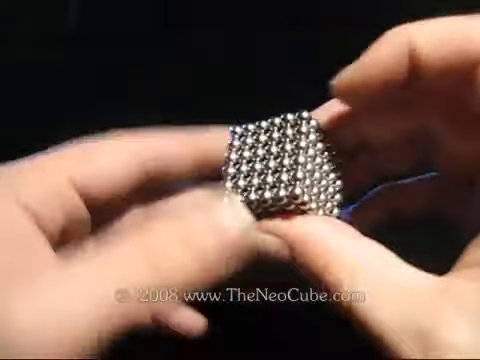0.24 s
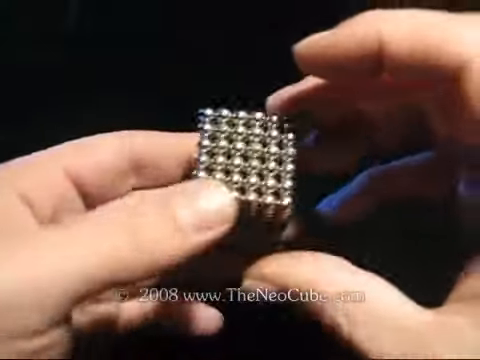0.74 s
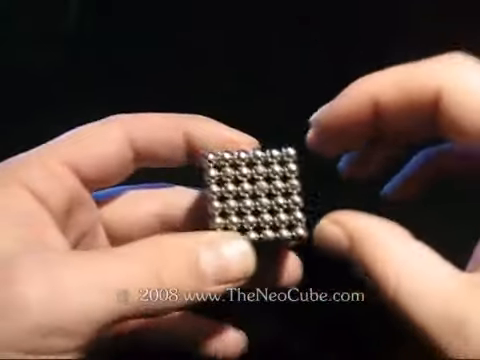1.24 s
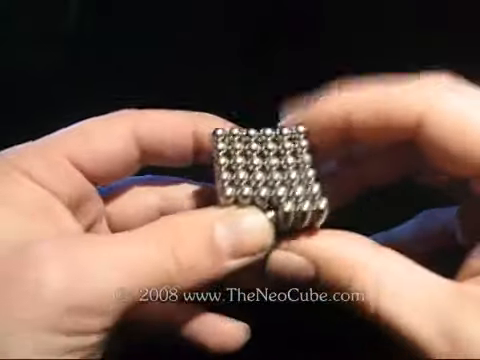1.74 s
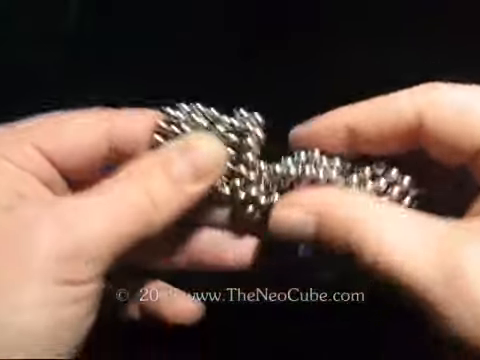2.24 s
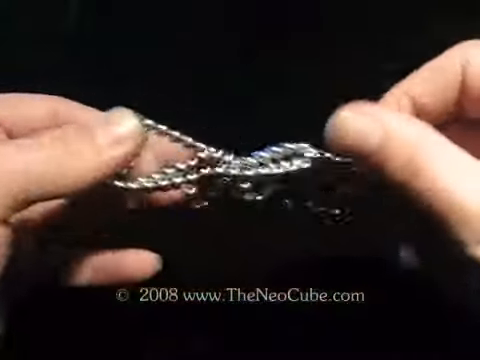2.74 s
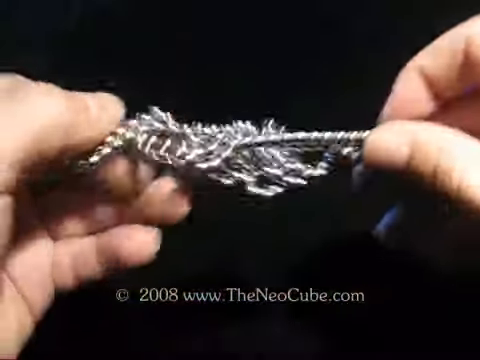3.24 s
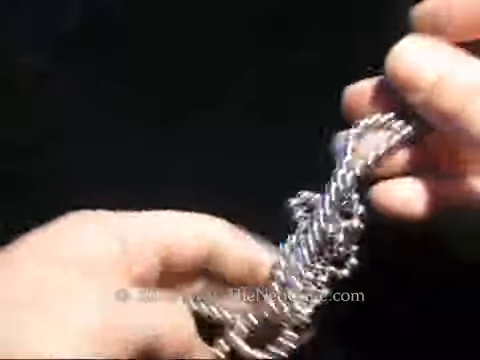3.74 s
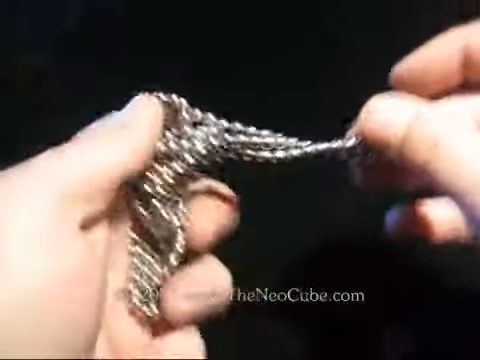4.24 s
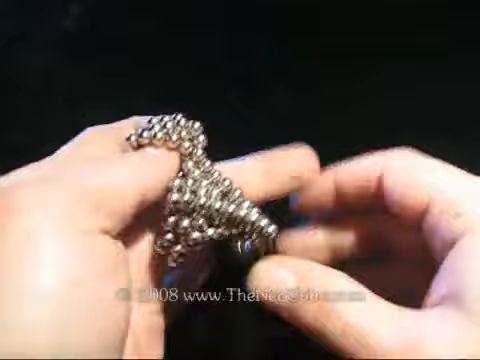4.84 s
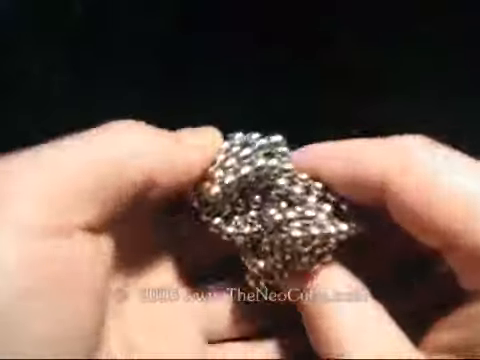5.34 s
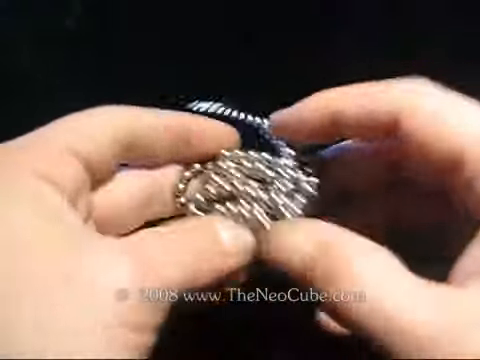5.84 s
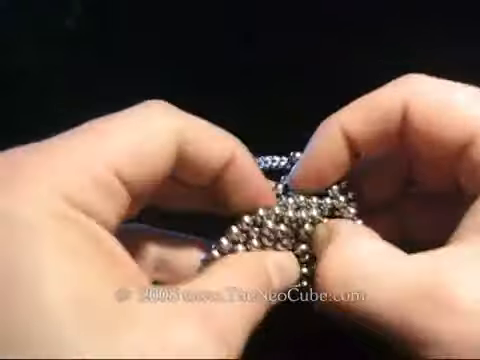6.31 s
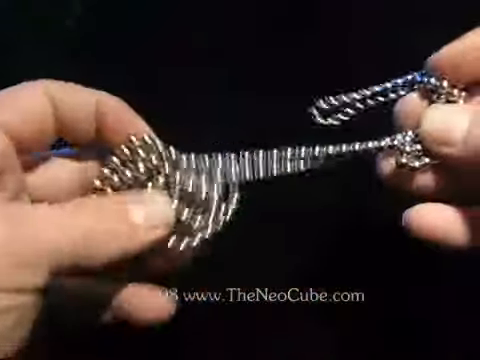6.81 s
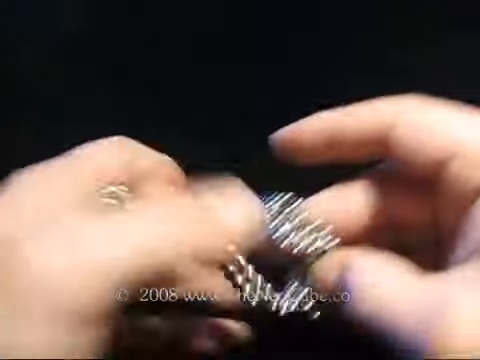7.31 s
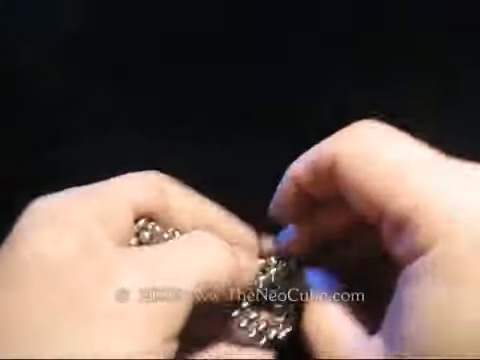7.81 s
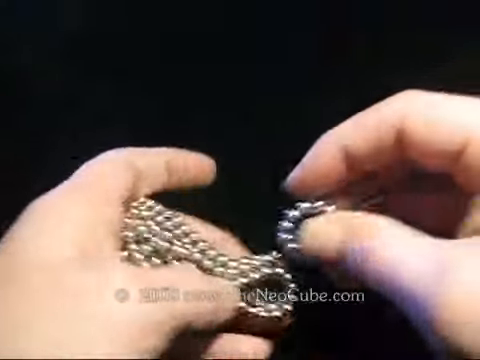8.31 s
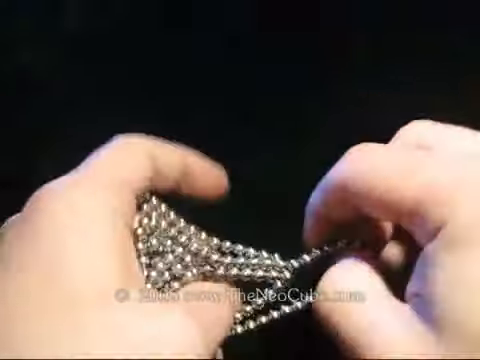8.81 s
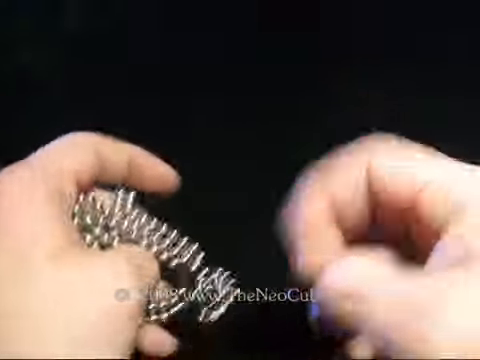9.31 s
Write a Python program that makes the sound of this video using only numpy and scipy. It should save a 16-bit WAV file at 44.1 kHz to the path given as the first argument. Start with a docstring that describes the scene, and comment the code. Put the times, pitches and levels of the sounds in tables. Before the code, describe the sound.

A low fan-like hum with hiss, then small magnetic metal balls snap, click and crackle irregularly in the hands, close and gritty.

```python
"""Small magnetic steel balls pulled apart and kneaded by hand, close to a cheap microphone.
It opens on a low fan-like hum with hiss: wavering sines over filtered noise. From about 1.7 s damped
rings with a sharp tick make the dry snaps, fast showers of them the zips, and ticks, rattle and dull noise
the crackle of each squeeze, while the hum dips and fades. Toward the end the snaps grow fainter and sparser.
Coarse 8-bit steps at a quarter of the rate make the quiet parts gritty throughout."""
import sys
import numpy as np
from scipy import signal
from scipy.fft import rfft, irfft, next_fast_len
from scipy.io import wavfile
from scipy.ndimage import uniform_filter1d, map_coordinates

SR = 44100
rng = np.random.default_rng(int(sys.argv[2]) if len(sys.argv) > 2 else 0)


def to_wav(sig):
    """Store sig (one row per channel, or 1-D mono) as 16-bit WAV at the path in sys.argv[1].

    Samples outside -1..1 are clipped; the rate is SR.
    """
    pcm = np.clip(np.atleast_2d(sig), -1, 1) * 32767
    pcm = np.round(pcm).astype(np.int16)
    wavfile.write(sys.argv[1], SR, pcm.T)  # frames by channels


N = 421596
TIME = np.arange(N) / SR  # s
HOLD = 4  # output samples for each sample of the recorder


def undb(db):
    """Decibels to gain."""
    return 10 ** (np.asarray(db) / 20)


def unit(x):
    """Scale to rms 1."""
    return x / np.sqrt(np.mean(x ** 2))


def gain_curve(rows):
    """Gain at every sample from (t/s, level/dB) rows."""
    return undb(np.interp(TIME, *np.transpose(rows)))


def add(out, s, sound):
    """Mix a sound in at a time in seconds."""
    start = max(int(round(s * SR)), 0)
    part = sound[:max(N - start, 0)]
    out[start:start + len(part)] += part


def colour(x, points):
    """Filter by a spectrum of (f/Hz, level/dB) points, joined by straight lines over log frequency."""
    hz, db = np.transpose(points)
    size = next_fast_len(N + 4096)
    freqs = np.maximum(np.fft.rfftfreq(size, 1 / SR), 1)
    gain = undb(np.interp(np.log(freqs), np.log(hz), db))
    return irfft(rfft(x, size) * gain, size)[:N]


def wander(rate):
    """Smooth random drift with a spread near 1, from `rate` random knots per second."""
    knots = rng.standard_normal(int(N / SR * rate) + 4)
    return map_coordinates(knots, [TIME * rate], order=2, mode="nearest")


def click(hz, t60_ms, hardness, size=512):
    """One collision: a hard contact tick, then a few cycles of the clump, damped by the fingers."""
    t = np.arange(size) / SR
    decay = 1000 ** (-t * 1000 / max(t60_ms, .5))
    wave = np.sin(2 * np.pi * hz * t) * decay
    wave[0] -= HOLD * hardness  # the tick is a single sample
    return wave


def patter(per_s, scatter_db, low_hz, high_hz, t60_ms, hardness, count=10):
    """Random small collisions of uneven size at many contacts, each with its own pitch; rms 1."""
    out = np.zeros(N)
    hits = max(int(per_s * N / SR / count), 1)
    for hz in np.geomspace(low_hz, high_hz, count):
        when, luck, side = rng.random((hits, 3)).T
        excess_db = scatter_db * np.minimum(-np.log(1 - luck), 3)  # few large blows, many small
        sizes = undb(excess_db) * np.sign(side - .5)  # either polarity
        blows = np.bincount((when * N).astype(int), sizes, N)
        out += signal.oaconvolve(blows, click(hz, t60_ms, hardness))[:N]
    return unit(out)


def snaps(rattle_db=-21, rise_s=.0013, fade_s=.0035):
    """Balls jump together; a faint rattle swells for about a millisecond before each snap and fades after it."""
    # the snaps that stand out: [t/s, strength/dB, ring f/Hz, ring t60/ms, hardness: tick relative to ring]
    snap_rows = [(1.669, 0, 1420, 1.6, 0.47), (1.6735, -3.5, 814, 1.8, .3), (1.7144, -15.5, 1670, 2.3, 0.2),
                 (1.7202, -8.5, 1280, 3.8, 0.1), (1.9105, -6, 1650, 2.2, 0.3),
                 (1.9135, -13.5, 1820, 2.1, 1.6), (1.9415, -8.5, 1920, 1.9, .15),
                 (1.9509, -10.5, 2000, 3.4, .1), (2.158, -19.5, 1850, 1.5, 0.4),
                 (2.2452, -12, 990, 2.6, 0.9), (2.2556, -12.5, 1440, 6, .8), (2.274, -12, 1300, 3.5, 0.75),
                 (2.3129, -12.5, 2270, 1.4, .25), (2.382, -22.5, 2270, 5.1, 0.2),
                 (2.5061, -18.5, 2700, 1.8, .5), (2.5257, -16.5, 1760, 1.1, 0.16),
                 (2.5722, -16.5, 1950, 2.7, 0.2), (2.6306, -20.5, 2270, 2.2, 0),
                 (2.6722, -9.5, 2940, 0.89, 1.94), (2.701, -10, 1500, 2.4, 1), (2.757, -3, 2880, 4.5, .5),
                 (2.7636, -11.5, 2390, 3.5, .3), (2.8361, -11.5, 2180, 3.9, 0), (2.8721, -12, 2560, 3.3, 0),
                 (3.0668, -13.5, 1530, 4.1, 0.36), (3.286, -18, 2440, 5.7, .1),
                 (3.2986, -6.5, 1590, 2.6, 0.27), (3.3049, -9, 2310, 4, 0), (3.3466, -14, 2100, 2.3, 0),
                 (3.3525, -13, 1850, 7, .3), (3.3724, -21.5, 1430, 4.8, 1), (3.4722, -19.5, 1810, 3.1, 0.7),
                 (3.568, -20.5, 1890, 1.8, -0.5), (3.5999, -4.5, 2470, 1.4, 0),
                 (3.6127, -13, 1850, 4.8, 0.35), (3.632, -11.5, 2010, 5, 0.2), (3.657, -21, 1960, 5, 0.2),
                 (3.8305, -15, 1640, 2.5, 0.8), (3.8474, -17, 1360, 2.2, 1), (3.938, 0, 1160, 2, 0.76),
                 (4.0467, -13.5, 1760, 0.55, .25), (4.1223, -11, 3360, 0.97, 0.26),
                 (4.1935, -15, 2300, 2.2, 0), (4.204, -11, 2020, 1.1, 0), (4.2655, -18, 1670, 6.2, .3),
                 (4.3146, -11.5, 1180, 1.7, 0.4), (4.3516, -13.5, 1410, 2.6, 0.56),
                 (4.4371, -21, 1850, 4.9, 0.1), (4.4613, -18.5, 1940, 9.2, 0.6),
                 (4.5117, -19, 1170, 2.7, 0.5), (4.5552, -20, 1670, 3, .15), (4.5809, -14, 1590, 3.3, .6),
                 (4.6569, -11.5, 1775, 6, 0.25), (4.7138, -28, 695, 4, 2), (4.7373, -22.5, 1800, 5.9, 0.14),
                 (4.796, -21.5, 1730, 1.4, 0.2), (4.8278, -20.5, 1610, 2.5, 0.7),
                 (4.914, -19.5, 1940, 2.3, 0), (4.941, -24.5, 3470, 1.8, 1.5),
                 (5.1509, -19.5, 1650, 2.9, 0.2), (5.18, -29, 695, 3.7, .8), (5.203, -23.5, 1940, 2.7, 0),
                 (5.279, -28.5, 2310, 3.6, -0.5), (5.4, -14.5, 1300, 1.75, .2),
                 (5.5262, -21.5, 1960, 4.7, 0.9), (5.6875, -8, 1870, 2, .3),
                 (5.6977, -15.5, 1290, 1.7, 0.9), (5.723, -10.5, 1270, 1.36, 0),
                 (5.768, -17, 2050, 2.5, 0.37), (5.816, -23, 1830, 3.7, 0.5), (5.95, -18, 2130, 1.4, 0.06),
                 (5.9867, -14, 1660, 3.8, 0.76), (6.0376, -13, 2040, 1.8, .5),
                 (6.056, -20.5, 1630, 2.8, .5), (6.106, -23.5, 1930, 7.2, .5),
                 (6.1963, -20.5, 1950, 1.4, .5), (6.2862, -13, 1900, 2.4, 0), (6.3656, -8, 2000, .8, .5),
                 (6.3699, -15, 2300, 5.2, 1.4), (6.393, -18.5, 3000, 1.8, 0.1), (6.456, -16, 1460, .9, 0),
                 (6.5018, -11.5, 1500, 0.97, 0.5), (6.5488, -13.5, 1550, 3, 0.33),
                 (6.575, -16, 1630, 2, 0.25), (6.612, -15.5, 2390, 3.7, .5), (6.6334, -9, 3090, 0.96, 0),
                 (6.647, -20, 1950, 7.8, 1.4), (6.6729, -14.5, 2220, 3.9, .25),
                 (6.6891, -12.5, 1850, 1.8, 0.23), (6.725, -14, 2030, 3, .3),
                 (6.828, -27.5, 1670, 1.9, -0.15), (6.9125, -36, 1840, 5, 1),
                 (6.9729, -26, 2430, 2.7, -0.2), (7.0583, -22.5, 1820, 5.6, 0.7),
                 (7.0794, -19.5, 2050, 1.35, 0.3), (7.1995, -24.5, 1680, 5.8, 1.2),
                 (7.308, -21, 1720, 4.1, 2.5), (7.566, -18, 1710, 4, .6), (7.6064, -18, 2650, 1.6, 0.2),
                 (7.7322, -20, 2240, 1.9, 0.83), (7.8446, -24, 1290, 3.9, 0.5),
                 (7.9208, -28, 1600, 1.8, 0.5), (7.9533, -18.5, 1960, 5, 0.6),
                 (7.995, -17.5, 1115, 3.2, 0.43), (8.04, -22.5, 1850, 2, 0.4),
                 (8.0791, -18.5, 1670, 3.1, 0.4), (8.103, -13, 1510, 1.4, 0.18),
                 (8.2125, -29, 1730, 6, 0.9), (8.4779, -17, 2080, 6, 0.47),
                 (8.5325, -16.5, 1940, 6.6, 0.47), (8.686, -27, 2930, 1.5, 0),
                 (8.8213, -24, 1770, 7.7, 1.1), (8.9603, -21, 2270, 2, .5), (8.9976, -16.5, 1390, 4.5, .9),
                 (9.042, -22, 1960, 2.3, 0.8), (9.152, -14, 1370, 1.44, .3), (9.1652, -17.5, 3570, 2.7, .5),
                 (9.2289, -17.5, 860, 2.3, 1.45), (9.2785, -25, 1680, 3.3, 1.4),
                 (9.3048, -16.5, 2270, 1.3, 0.25), (9.4313, -27, 1440, 5.4, .55),
                 (9.4797, -21, 1590, 7.8, 0.14)]
    blows, swell = np.zeros(N), np.zeros(N)
    t = TIME[:2048] - TIME[512]  # zero at the snap
    shape = np.exp(np.minimum(t / rise_s, -t / fade_s))
    for s, db, hz, t60_ms, hardness in snap_rows:
        add(blows, s, undb(db) * click(hz, t60_ms, hardness))
        add(swell, s + t[0], undb(db) * shape)
    rattle = patter(per_s=2500, scatter_db=3.5, low_hz=893, high_hz=3397, t60_ms=2.5, hardness=0.44)
    return blows + undb(rattle_db) * swell * rattle


def zips():
    """A row closes ball after ball, too fast to tell the clicks apart."""
    # rows of balls closing in a quick run: [middle t/s, half-length/s, peak level/dB]
    zip_rows = [(1.719, .008, -35.5), (1.915, 0.004, -22.5), (1.945, .008, -25), (2.254, 0.014, -28.5),
                (2.574, 0.007, -37.5), (2.674, 0.0058, -31), (2.699, 0.0056, -28), (2.76, .011, -34.5),
                (3.067, 0.0058, -29), (3.301, 0.0063, -28.5), (3.934, 0.0035, -35), (4.253, .011, -36.5),
                (4.354, 0.0083, -32), (4.451, .01, -32.5), (5.686, 0.021, -38), (6.364, 0.013, -31),
                (7.953, .0075, -34.5)]
    swell = np.zeros(N)
    for s, length, db in zip_rows:
        shape = signal.windows.hann(int(2 * abs(length) * SR) + 3) ** .5
        add(swell, s - length, undb(db) * shape)
    return swell * patter(per_s=3200, scatter_db=3.0, low_hz=1113, high_hz=2910, t60_ms=3, hardness=0.3)


def kneading(attack_s=0.011, release_s=0.015):
    """How hard the clump is worked: each squeeze builds, holds and dies away over the light handling."""
    # the fingers squeeze or pull the clump: [start t/s, length/s, effort level/dB]
    squeezes = [(1.66, 0.02, -52), (1.912, .06, -45), (2.211, .11, -42.5), (2.482, 0.054, -46),
                (2.68, .03, -41.5), (2.761, 0.093, -46), (3.207, 0.19, -44), (3.39, 0.12, -49),
                (3.61, 0.043, -47.5), (3.819, 0.027, -44), (4.237, .08, -41.5), (4.549, 0.07, -46.5),
                (4.656, 0.028, -46.5), (4.794, 0.041, -52), (4.906, 0.048, -53), (5.667, .06, -49.5),
                (5.97, 0.088, -51), (6.183, 0.044, -50), (6.348, 0.036, -37.5), (6.54, 0.18, -48),
                (6.685, 0.062, -34.5), (7.041, .05, -45), (7.187, 0.019, -47), (7.718, 0.035, -48),
                (7.986, 0.14, -50), (8.76, .08, -47), (8.959, .06, -47), (9.119, 0.079, -49),
                (9.273, 0.038, -46)]
    # faint turning of the clump in the hands between squeezes: [t/s, effort level/dB]
    handling = [(1.55, -70), (1.65, -57.5), (2.0, -57), (2.2, -54), (4.2, -57.5), (5.1, -56.5),
                (6.6, -54.5), (6.85, -58.5), (7.3, -55.5), (9.56, -55.5)]
    power = gain_curve(handling) ** 2
    for start, length, db in squeezes:
        build = np.clip(1 + (TIME - start) / attack_s, 0, 1)  # complete at the start time
        release = np.exp(-np.clip((TIME - start - length) / release_s, 0, 20))
        power = power + (undb(db) * build * release) ** 2
    return np.sqrt(power)


def crackle(effort, crackle_db=-1.6, rub_db=-7, fits_db=1.0):
    """Balls roll and slip in fits: sparse ticks, a dense rattle when worked hard, the dull rub of skin."""
    dense = np.clip(effort / undb(-39), 0, 1)  # share of rattle
    ticks = patter(per_s=190, scatter_db=2.0, low_hz=1006, high_hz=2970, t60_ms=3.3, hardness=0.46)
    rattle = patter(per_s=2400, scatter_db=1.36, low_hz=1190, high_hz=2932, t60_ms=3.4, hardness=0.33)
    skin = [(20, 1.5), (90, -.5), (300, -4.5), (900, -13), (5000, -27.5), (6000, -96)]  # (f/Hz, level/dB)
    rub = unit(colour(rng.standard_normal(N), skin))
    fits = unit(undb(fits_db * wander(60)))
    loose = fits * (ticks + undb(rub_db) * rub)
    return undb(crackle_db) * effort * (np.sqrt(1 - dense ** 2) * loose + dense * rattle)


def small_snaps(effort, small_db=-2, full_db=-52):
    """Single balls hop over at random; the magnets' pull, more than the fingers, limits how hard they land."""
    strength = np.minimum(effort, undb(full_db))
    hops = patter(per_s=34, scatter_db=1.3, low_hz=1400, high_hz=2504, t60_ms=3.4, hardness=.3)
    return undb(small_db) * strength * hops


def smear(x, smear_db=-18, t60_s=.016):
    """A short, bright noise tail softens each click."""
    t = TIME[:2048]
    tail = np.diff(rng.standard_normal(len(t) + 1)) * np.exp(-np.log(1000) * t / t60_s)  # diff thins the bass
    tail = signal.sosfilt(signal.butter(2, 5000, fs=SR, output="sos"), tail)
    return x + undb(smear_db) * signal.oaconvolve(x, tail / np.linalg.norm(tail))[:N]


def room(x, wet_db=-19, t60_s=0.13):
    """Faint, short reflections from the desk and the walls, as dying noise after a 3 ms gap."""
    t = TIME[:8192]
    tail = rng.standard_normal(len(t)) * np.exp(-np.log(1000) * t / t60_s) * (t > .003)
    return x + undb(wet_db) * signal.oaconvolve(x, tail / np.linalg.norm(tail))[:N]


def hum(air_db=-41.5, drift_hz=1.1, waver_db=1.56):
    """Slightly unsteady motor lines over a rush of air, behind the balls."""
    # the hum dips a few times and fades: [t/s, gain level/dB]
    hum_level = [(0, -1.2), (1.72, -1), (1.75, -14.5), (1.88, -3.5), (2.06, -18.5), (2.22, -4.5),
                 (2.33, -18), (2.45, -8), (2.68, -5.5), (2.83, -17), (2.92, -9), (4.1, -14), (4.5, -22),
                 (5.7, -19.5), (6.6, -22.5), (7.1, -25.5), (8, -20), (9.56, -21.5)]
    # rotation harmonics and whines, ahead of that gain: [mean f/Hz, rms level/dB]
    hum_lines = [(74.8, -39.5), (149.5, -48.5), (236, -53.5), (283, -55), (376, -59.5), (648, -63),
                 (847.8, -58.5), (3404.6, -58)]
    # spectrum shape of the rush of air: [f/Hz, relative level/dB]
    air = [(15, -14.5), (28, -4), (60, 0), (100, 0), (135, -6), (190, -11), (265, -6.5), (450, -13),
           (800, -13), (1150, -17.5), (3300, -21), (5400, -22.5)]
    rush = colour(rng.standard_normal(N), air + [(7000, -34.5), (12000, -79)])
    out = undb(air_db) * unit(rush)
    for hz, db in hum_lines:
        turns = np.cumsum(hz + drift_hz * wander(5)) / SR + rng.random()
        level = np.sqrt(2) * undb(db + waver_db * wander(6))  # peak from rms
        out += level * np.sin(2 * np.pi * turns)
    return out * gain_curve(hum_level)


def lulls(depth_db=-17):
    """Gain that sinks during each lull."""
    # pauses in which the crackle and the hum drop back: [from t/s, to t/s]
    pauses = [(2.008, 2.05), (4.758, 4.81), (5.027, 5.07), (5.894, 5.94), (6.834, 6.94), (7.259, 7.276),
              (7.869, 7.92), (8.192, 8.25)]
    inside = sum((TIME > start) & (TIME < end) for start, end in pauses)
    return undb(depth_db * uniform_filter1d(np.minimum(inside, 1.), size=128))  # about 3 ms edges


def scene():
    """The balls, coloured and softened, close in front of the hum."""
    # colour of the hands and the microphone: (f/Hz, level/dB)
    hands = [(40, -5.5), (150, -1), (400, -1), (900, 0.0), (1300, -0.74), (1900, 0), (3200, -2), (5400, -1.5)]
    busy = lulls()
    effort = kneading()
    worked = busy * (crackle(effort) + small_snaps(effort))
    balls = colour(snaps() + zips() + worked, hands)
    return (room(smear(balls)) + busy * hum())[None]


def suppress(x, open_db=-56, window_s=.012, most_db=4):
    """Noise suppressor: turns everything down a little whenever not much is happening above the bass."""
    upper = signal.sosfilt(signal.butter(2, 500, "high", fs=SR, output="sos"), x)
    power = uniform_filter1d(upper ** 2, int(window_s * SR) + 1)
    below_db = open_db - 10 * np.log10(np.maximum(power, 1e-12))
    return x * undb(-np.clip(below_db, 0, most_db))


def record(dry, ceiling=1.0, step=1 / 128, bias=.2, grit_db=-24, top_hz=16000):
    """Held 8-bit samples at a quarter of the rate: faint sound breaks into blips, mirrored into the treble."""
    slow = signal.resample_poly(suppress(dry), 1, HOLD, axis=-1)
    rounded = ceiling * np.tanh(slow / ceiling)  # the input stage rounds the hardest snaps
    stepped = step * np.round(rounded / step - bias)  # bias in steps
    # faint noise that follows the level of the sound
    grit = undb(grit_db) * rng.standard_normal(stepped.shape) * stepped
    hiss = undb(-80) * rng.standard_normal(stepped.shape)
    held = np.repeat(stepped + grit + hiss, HOLD, axis=-1)
    return signal.sosfilt(signal.ellip(10, .1, 80, top_hz, fs=SR, output="sos"), held)


dry = scene()
out = record(dry)
to_wav(out)
```